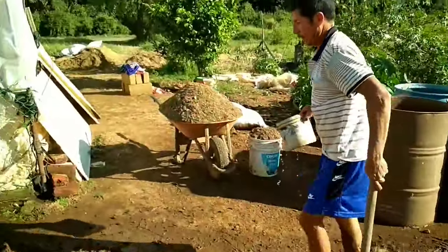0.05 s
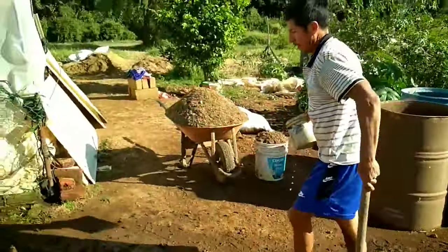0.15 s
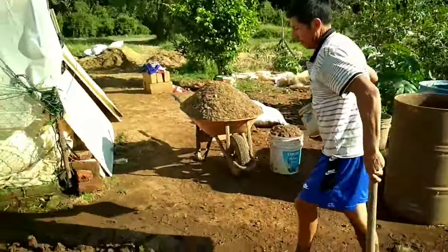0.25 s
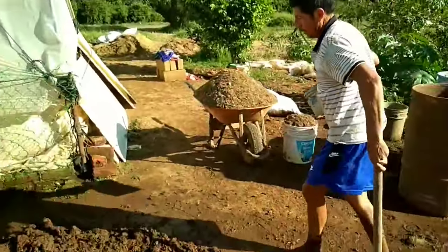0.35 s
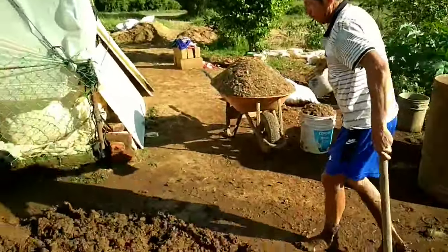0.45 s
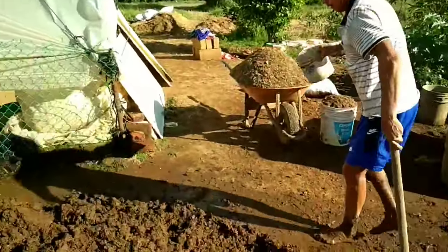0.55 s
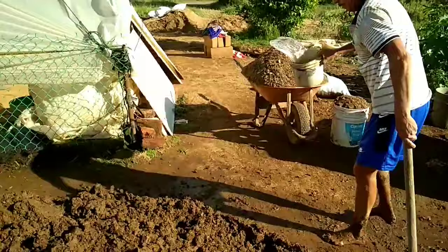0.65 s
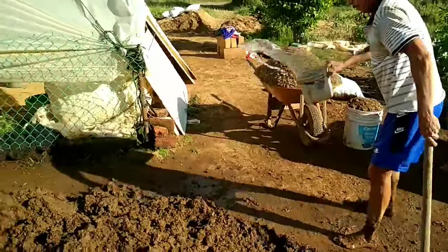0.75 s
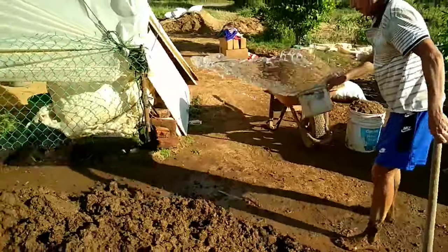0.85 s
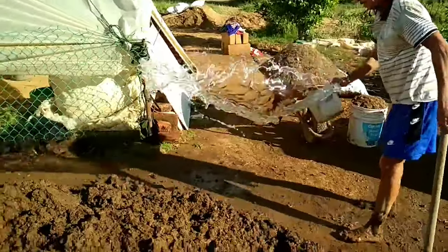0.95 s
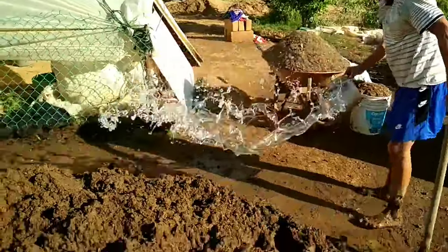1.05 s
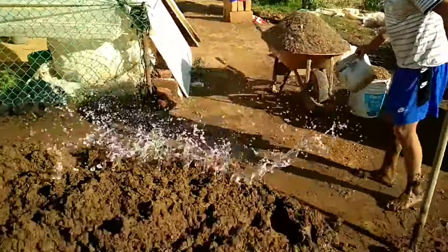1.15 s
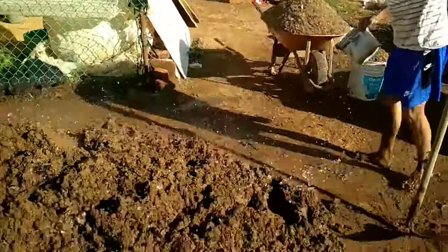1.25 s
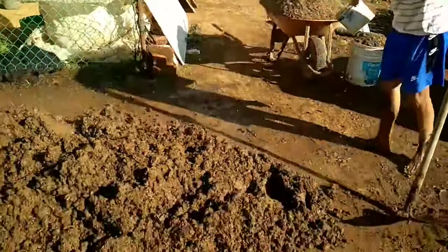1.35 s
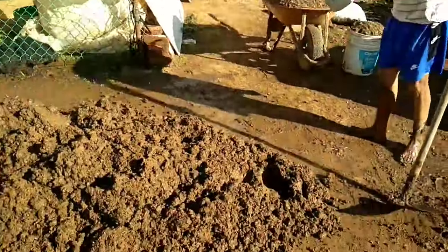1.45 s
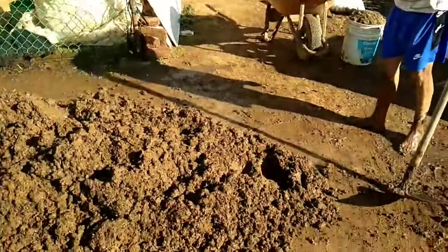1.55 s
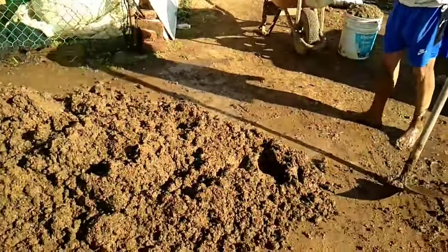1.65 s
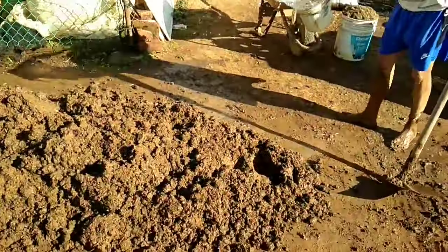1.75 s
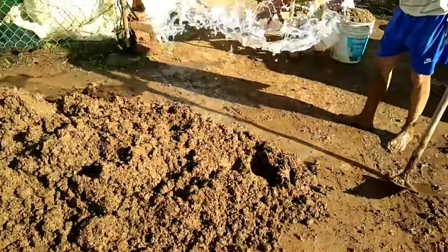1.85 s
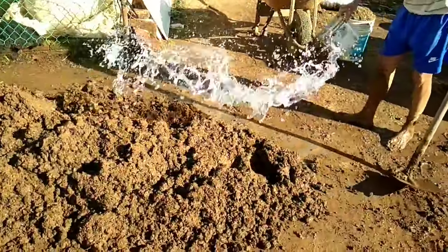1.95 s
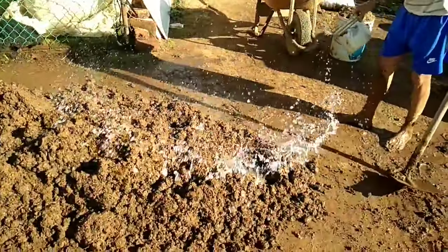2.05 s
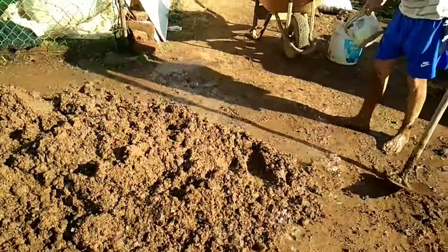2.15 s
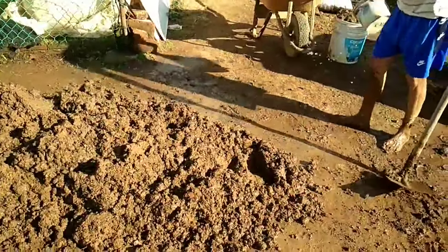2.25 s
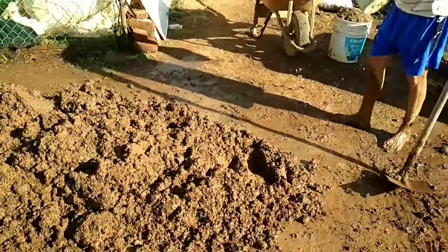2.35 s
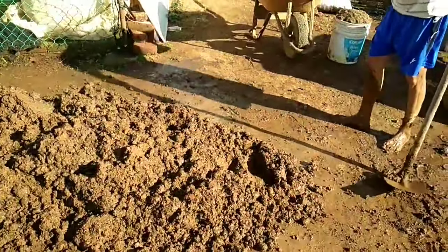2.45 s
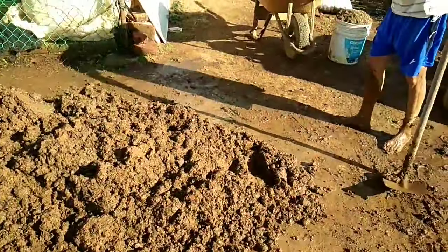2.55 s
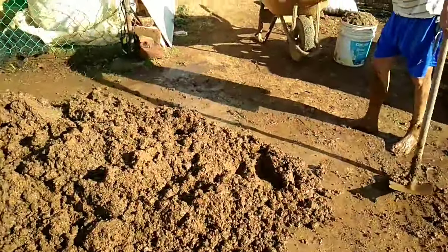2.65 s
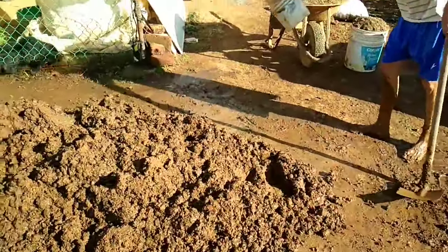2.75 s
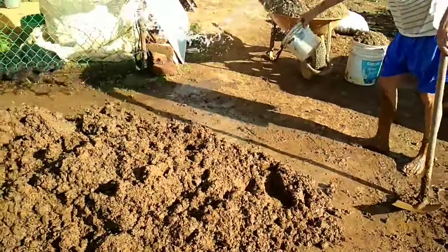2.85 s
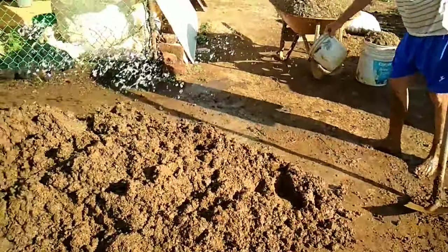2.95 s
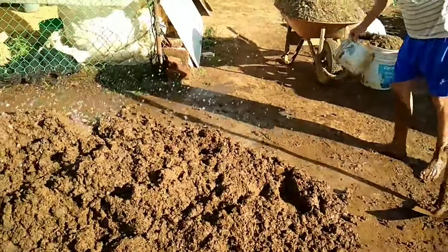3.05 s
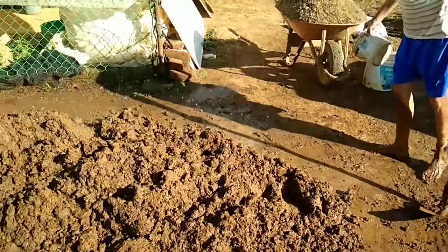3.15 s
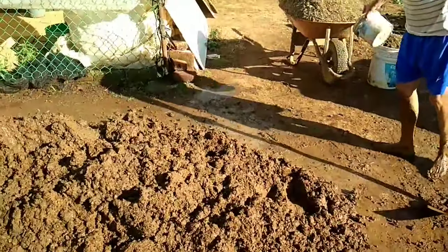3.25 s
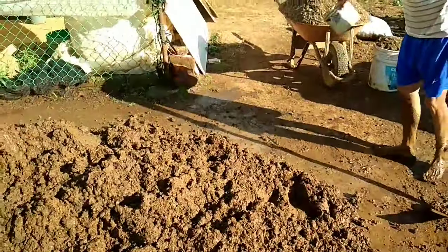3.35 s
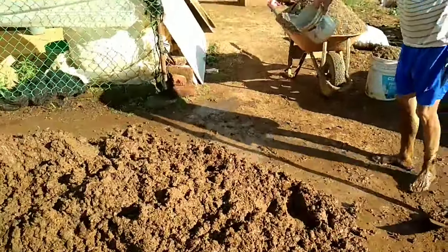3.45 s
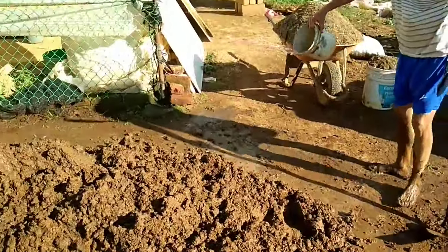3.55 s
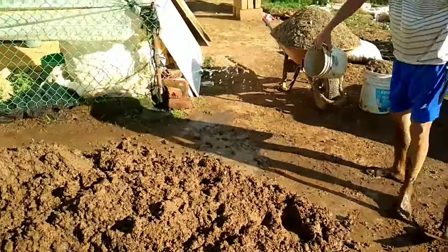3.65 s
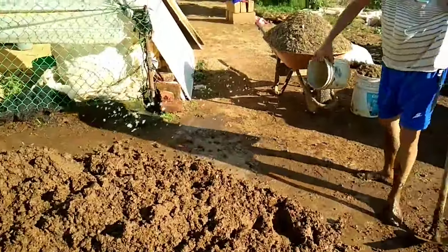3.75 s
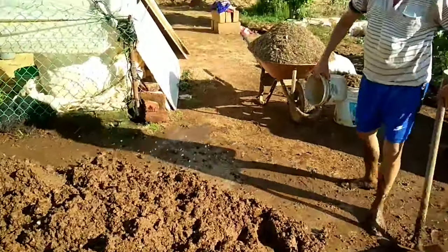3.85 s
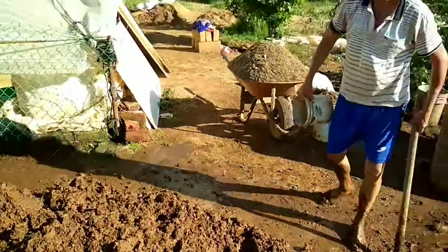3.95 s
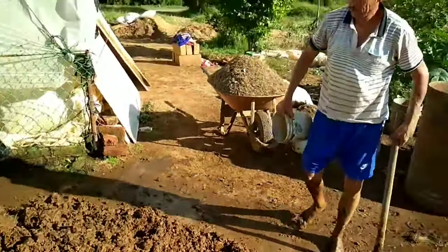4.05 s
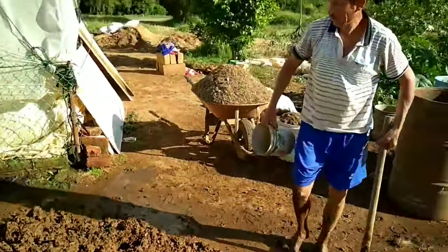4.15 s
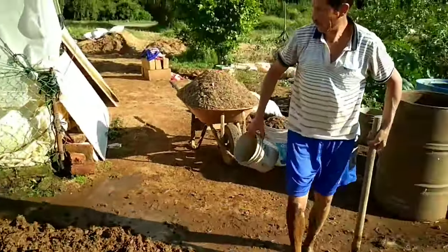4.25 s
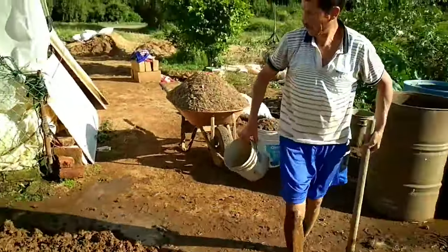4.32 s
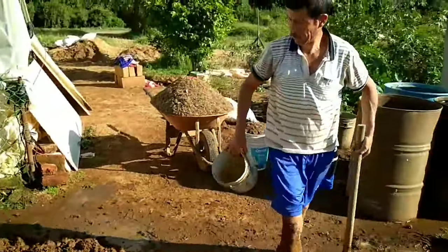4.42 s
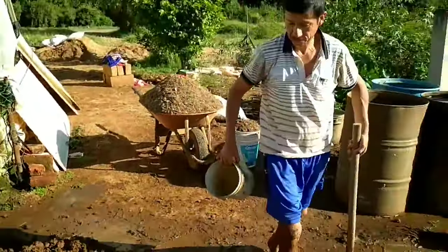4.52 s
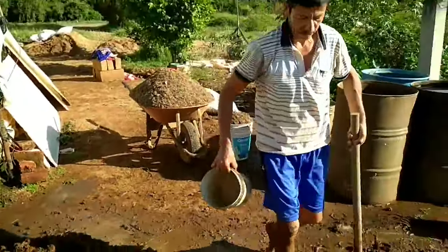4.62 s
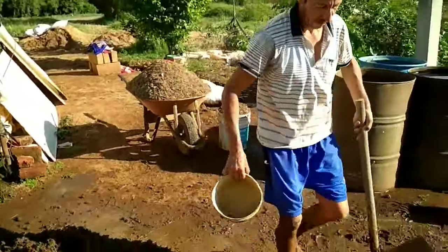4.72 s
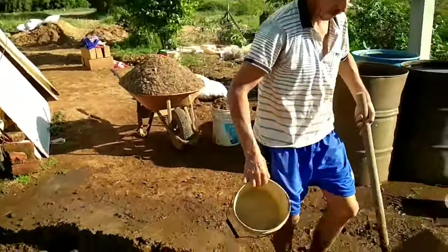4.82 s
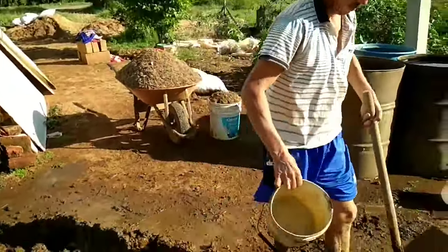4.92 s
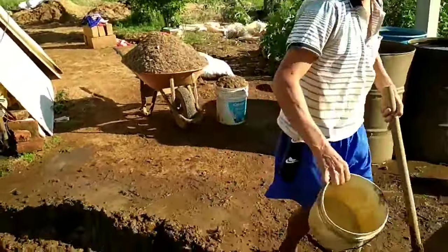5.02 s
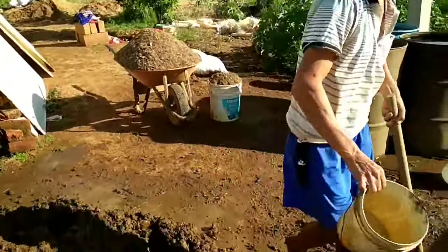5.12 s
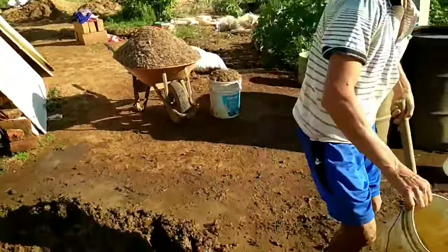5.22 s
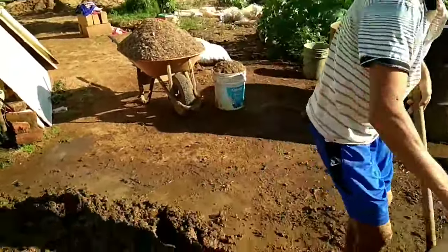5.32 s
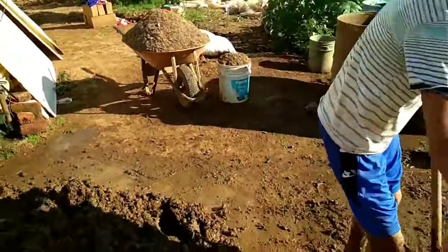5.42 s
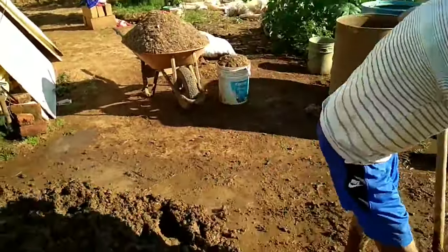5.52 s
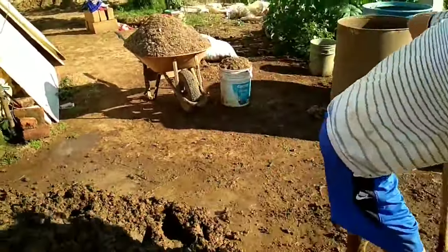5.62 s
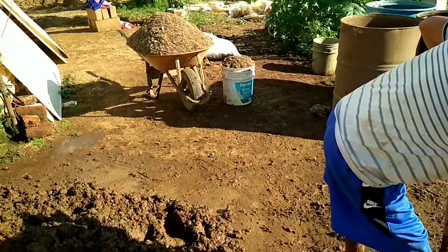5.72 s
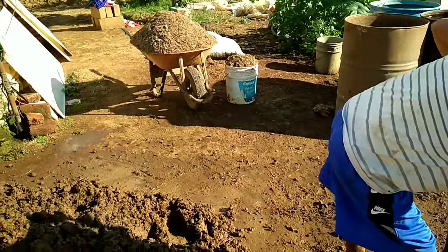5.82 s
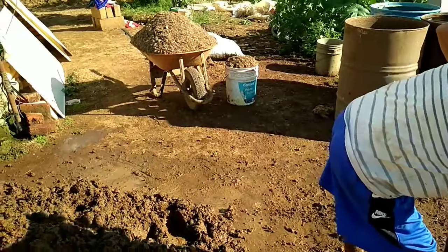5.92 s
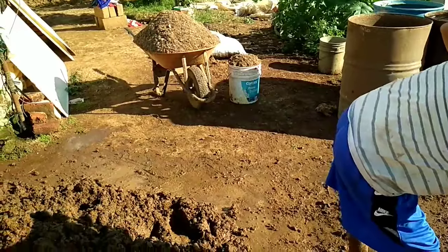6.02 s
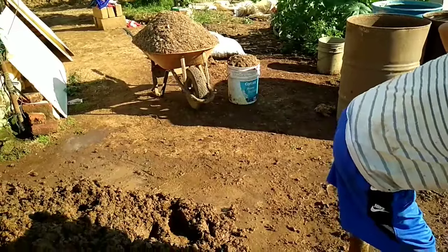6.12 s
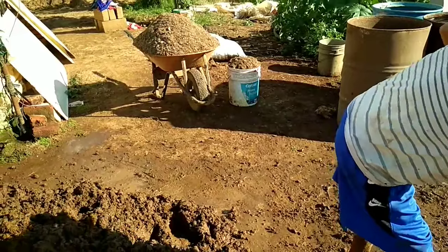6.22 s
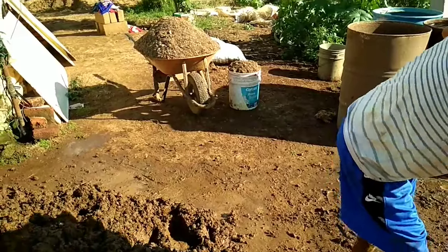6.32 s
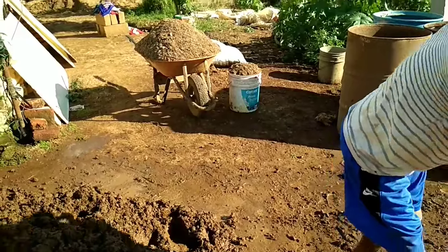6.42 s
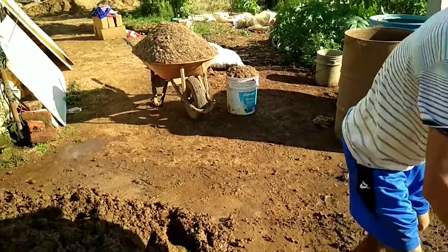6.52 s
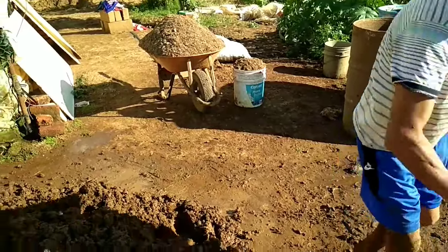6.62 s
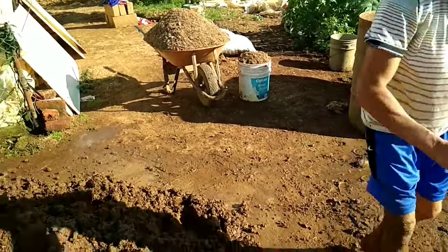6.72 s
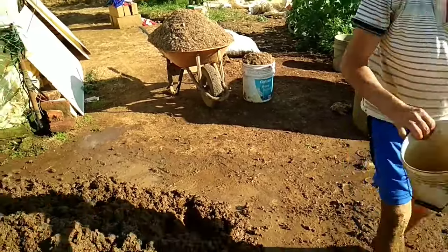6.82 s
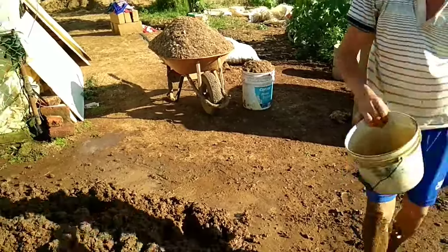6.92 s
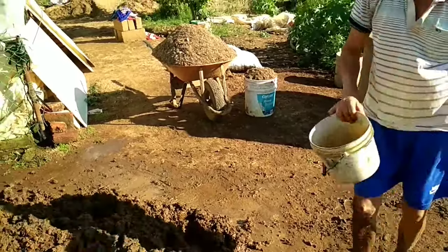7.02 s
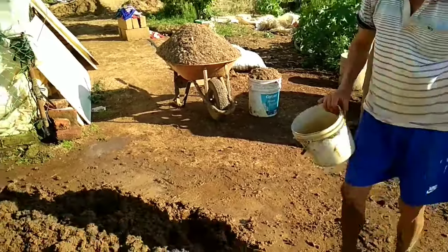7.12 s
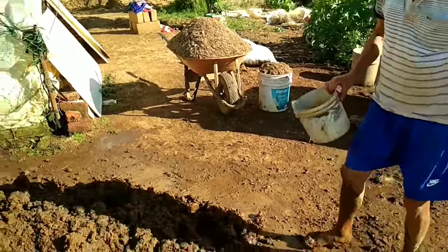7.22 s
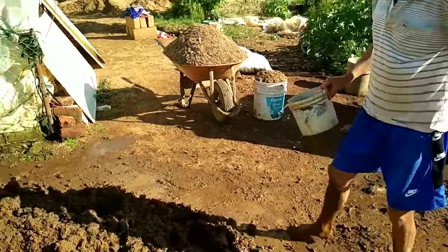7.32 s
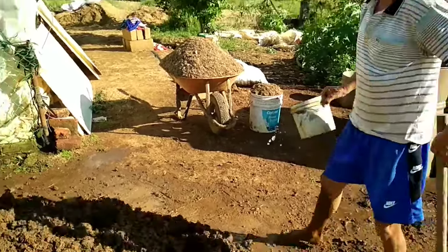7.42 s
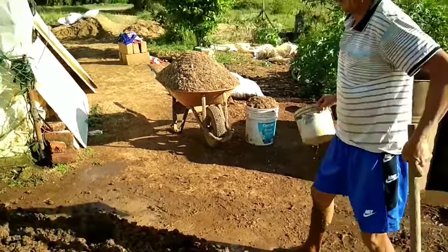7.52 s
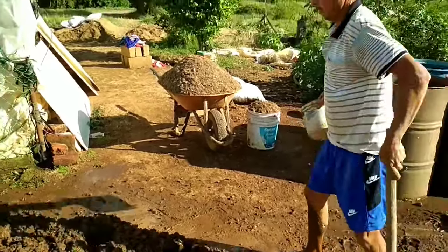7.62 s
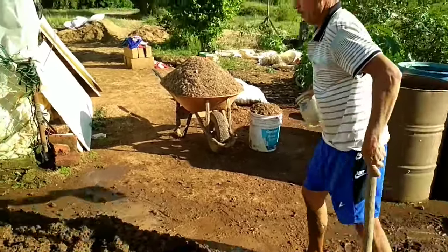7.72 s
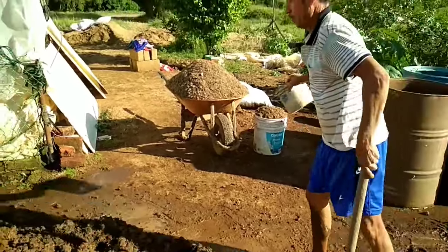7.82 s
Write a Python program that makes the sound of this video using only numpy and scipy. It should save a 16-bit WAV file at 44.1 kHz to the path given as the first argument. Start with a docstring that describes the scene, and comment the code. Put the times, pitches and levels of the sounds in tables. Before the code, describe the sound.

Splashes of water patter onto clay outdoors, with plastic bucket knocks, a gurgling refill, faint bird chirps and low wind rumble.

```python
"""Flinging water over wet clay

A barefoot man flings water from a plastic bucket, walks about and refills it. Drops patter and snap on
the mud, drips ring as tiny bubbles, the bucket wall knocks, its handle rattles and air gulps in the
dipped bucket. The yard echoes, two birds call and a breeze rumbles on the two microphone ports."""
import sys
import numpy as np
from scipy import signal
from scipy.io import wavfile
from scipy.ndimage import uniform_filter1d, map_coordinates

SR = 44100
rng = np.random.default_rng(int(sys.argv[2]) if len(sys.argv) > 2 else 0)


def store_wav(level_fs):
    """Save 16-bit WAV to argv[1]."""
    pcm = np.round(np.clip(np.atleast_2d(level_fs), -1, 1) * 32767)
    wavfile.write(sys.argv[1], SR, pcm.T.astype(np.int16))


N = 347067


def amp(db):
    return np.exp(np.asarray(db) * np.log(10) / 20)


def unit_rms(x):
    return x / np.sqrt(np.mean(x ** 2) + 1e-20)


def unit_peak(sound):
    """Gives the loudest 3 ms the power of a sine of peak 1."""
    return sound / np.sqrt(2 * uniform_filter1d(sound ** 2, size=128).max())


def butter(hz, kind="low", order=2):
    return signal.butter(order, hz, kind, fs=SR, output="sos")


def automation(rows, column):
    """One column of a timed table, read at every sample."""
    rows = np.array(rows)
    return np.interp(np.arange(N) / SR, rows[:, 0], rows[:, column])


def colour(x, points):
    """Minimum-phase EQ of unit energy, shaped by (f/Hz, level/dB) points."""
    hz, db = np.transpose(points)
    log_gain = np.interp(np.log(np.fft.rfftfreq(8192, 1 / SR) + 1), np.log(hz), db) * np.log(10) / 20
    mirrored = np.concatenate([log_gain, log_gain[-2:0:-1]])
    taps = np.fft.ifft(np.exp(np.conj(signal.hilbert(mirrored)))).real[:4096]
    taps = (taps / np.linalg.norm(taps)).reshape((1,) * (x.ndim - 1) + (-1,))
    return signal.oaconvolve(x, taps, axes=-1)[..., :len(x.T)]


def add(mix, s, sound):
    part = mix[round(s * SR):][:len(sound)]
    part += sound[:len(part)]


def contact(t60, blow, rise_s):
    """A first blow followed by dying gritty contact."""
    t = np.arange(8192) / SR
    grit = rng.standard_normal(8192) * amp(-60 * t / max(t60, .004)) * (1 - np.exp(-t / rise_s))
    grit /= np.linalg.norm(grit)
    grit[1] += blow
    return grit


def ring(modes, lift_db, drive, detune):
    """Modes of a body, randomly detuned by grip and load, shaken by the drive."""
    t = np.arange(4096)[:, None] / SR
    hz, db, t60 = np.transpose(modes)
    hz = hz * (1 + detune * rng.standard_normal(len(hz)))
    partials = amp(db + lift_db - 60 * t / t60) * np.sin(2 * np.pi * hz * t) * (1 - np.exp(-t / .0015))
    return unit_peak(signal.fftconvolve(drive, partials.sum(axis=1)))


def bubble(hz, cycles, glide):
    """A pocket of air rings and rises in pitch as it nears the surface."""
    turns = np.arange(int(3 * cycles * SR / hz)) * hz / SR
    envelope = np.exp(-turns / cycles * 2) * (1 - np.exp(-turns * 2))
    tone = np.sin(2 * np.pi * turns * (1 + glide * turns / cycles / 2)) * envelope
    return tone / np.linalg.norm(tone)


# Tone of the outdoor bed: f/Hz, level/dB
AIR_EQ = [(120, -26), (200, 20), (525, 12), (1950, 2.5), (3010, 3.5), (4100, -29), (15500, -39.5)]
def air():
    """A faint, wide bed of outdoor noise."""
    return amp(-80) * unit_rms(colour(rng.standard_normal((2, N)), AIR_EQ))


# Tone of the wind rumble: f/Hz, level/dB
RUMBLE_EQ = [(8.8, -58.5), (15, -6), (91, 0), (142, -5), (270, -28), (341, -32.5), (500, -46.5), (650, -72),
             (1100, -120)]
# Gust automation: t/s, level/dB, left minus right/dB
GUSTS = [(0.0, -77, 1), (0.06, -38.5, -8.5), (0.26, -56.5, 36), (0.46, -62.5, 17), (0.63, -42.5, 3),
         (0.68, -46, -3.5), (0.79, -51.5, 21.5), (0.99, -56.5, 5), (1.49, -66.5, 25), (1.97, -63.5, -8),
         (2.08, -51, 10), (2.41, -62.5, 24), (3.09, -44.5, 9.5), (3.64, -69, -1.5), (3.9, -56.5, -10),
         (4.08, -44.5, 3.5), (4.36, -57.5, -19.5), (4.56, -61.5, 32.5), (4.8, -47, -0.5), (5.13, -58, 19),
         (5.19, -42, 4), (5.39, -62, 26), (5.76, -49.5, -8), (5.87, -62, 43), (5.96, -63.5, 10),
         (6.53, -57.5, -27), (7.12, -69, -2), (7.61, -59.5, -13.5), (7.8, -71.5, 5), (7.87, -39.5, 0)]
def breeze():
    """Lumpy turbulence, mostly unrelated on the two ports."""
    left, right, both = rng.standard_normal((3, N))
    lumps = signal.sosfilt(butter(14), rng.standard_normal((3, N)))
    lumps_db = 4.66 * unit_rms(lumps[:2] + lumps[2])
    rumble = unit_rms(colour(np.array([left, right]) + .5 * both, RUMBLE_EQ) * amp(lumps_db))
    pan_db = automation(GUSTS, column=2) / 2
    return rumble * amp(automation(GUSTS, column=1) + np.array([pan_db, -pan_db]))


# Near bird cues: t/s, level/dB
CHIPS = [(0.567, -54), (1.4684, -52), (4.084, -58), (4.8052, -51), (5.4786, -49), (6.078, -45)]
# Far bird cues: t/s, length/s, start f/Hz, end f/Hz, level/dB
WHISTLES = [(0.736, 0.079, 2910, 3360, -79), (0.792, 0.049, 3130, 3000, -80),
            (7.529, 0.053, 3240, 3400, -79)]
def birds():
    """Off to the right, a near bird dips and lifts its pitch, echoing in the trees; a far one whistles."""
    out, t, dip_s = np.zeros(N), np.arange(760) / SR, .011
    hz = 6500 + np.where(t < dip_s, 3.0e6, 4.5e6) * abs(t - dip_s) ** 1.5
    chip = np.sin(2 * np.pi * np.cumsum(hz) / SR) * (t / t[-1]) ** 2 * signal.windows.tukey(760, .2)
    for s, db in CHIPS:
        trees = contact(0.17, blow=1.3, rise_s=0.0013)
        add(out, s - dip_s, amp(db) * signal.fftconvolve(chip, trees))
    for s, length, from_hz, to_hz, db in WHISTLES:
        n = int(length * SR)
        waver = 1 + 0.68 * uniform_filter1d(rng.standard_normal(n), size=100)
        hz = np.linspace(from_hz, to_hz, n) * waver
        add(out, s, amp(db) * np.sin(2 * np.pi * np.cumsum(hz) / SR) * np.hanning(n))
    return out * amp([[-5], [2.5]])


# Reverb time of the yard: f/Hz, t60/s
YARD_DECAY = [(300, 0.36), (1000, 0.35), (3000, 0.21), (8000, 0.1), (15000, 0.011)]
def yard(x):
    """Sheds, barrels and ground throw the sound back."""
    hz, t, noise = signal.stft(rng.standard_normal((2, 2, SR // 2)), SR, nperseg=256)
    alike = np.exp(-(hz / 1800) ** 2)[:, None]  # both ports share the bass of the echoes
    noise[:, 1] = alike * noise[:, 0] + np.sqrt(1 - alike ** 2) * noise[:, 1]
    band_hz, band_t60 = np.transpose(YARD_DECAY)
    t60 = np.interp(np.log(hz + 1), np.log(band_hz), band_t60)[:, None]
    tails = signal.istft(noise * amp(-60 * t / t60), SR, nperseg=256)[1]
    tails = np.pad(tails, ((0, 0), (0, 0), (200, 0))) / np.linalg.norm(tails[0, 0])  # 4.5 ms pre-delay
    first, second = (signal.oaconvolve(x, tail, axes=1)[:, :N] for tail in tails)
    # two echo tails crossfade quickly, so the echoes shimmer instead of ringing on one pitch
    turn = 2 * np.pi * 7.0 * np.arange(N) / SR
    return first * np.cos(turn) + second * np.sin(turn)


# Pan automation for the man: t/s, right port delay/ms, treble left minus right/dB
BEARING = [(0, .25, -1.5), (.6, .1, -2.5), (1.1, .02, -3), (2.5, .03, -3.5), (3.1, .12, -4), (4.1, .25, -4),
           (4.6, .05, -3.5), (5.2, .15, -1.5), (5.7, .26, 1), (7.1, .25, 1), (7.6, .04, -2)]
def place(pair):
    """Delays the right port and pans the treble to where the man stands."""
    delay = automation(BEARING, column=1) * SR / 1000
    pair = np.array([pair[0], map_coordinates(pair[1], [np.arange(N) - delay], order=3)])
    treble = signal.sosfilt(butter((3000, 11000), "band"), pair)
    pan_db = automation(BEARING, column=2) / 2
    return pair + treble * (amp(np.array([pan_db, -pan_db])) - 1)


# Pitched drip cues: t/s, level/dB, bubble f/Hz
DRIPS = [(.108, -64.5, 1123), (.287, -64.5, 946), (1.299, -46.5, 1256), (1.309, -44, 1413),
         (1.995, -42, 1510), (6.587, -63, 1170), (6.618, -57.5, 3160), (6.644, -70, 2880),
         (6.682, -59, 3100), (6.945, -42, 2230), (7.008, -43, 2263), (6.965, -52, 1440), (6.979, -43, 2640),
         (7.179, -58, 1550), (7.198, -64, 1530), (7.254, -64, 3700), (7.349, -57.5, 3400),
         (7.621, -63, 1230)]
def drips():
    """Each drip traps a small ringing bubble."""
    out = np.zeros(N)
    for s, db, hz in DRIPS:
        impact = contact(0.0095, blow=1.6, rise_s=0.00082)
        add(out, s, amp(db) * unit_peak(signal.fftconvolve(impact, bubble(hz, cycles=16, glide=0.074))))
    return out


# Wet snap cues: t/s, level/dB
SNAPS = [(0.046, -48.5), (0.109, -53), (0.234, -52), (0.272, -50), (0.2882, -40.5), (.315, -56),
         (.9764, -39.5), (1.024, -50), (1.041, -25.5), (1.059, -34.5), (1.11, -39), (1.1328, -36),
         (1.1463, -41), (1.1652, -28), (1.595, -59.5), (1.934, -50), (1.984, -35.5), (2.0711, -47),
         (2.2183, -25.5), (2.2654, -40), (2.4169, -36), (2.646, -39.5), (3.2083, -37), (3.8496, -61),
         (3.881, -44), (3.904, -44), (3.966, -52), (4.0114, -36), (5.046, -57), (5.181, -46), (5.4113, -41),
         (5.7519, -30.5), (6.094, -40), (6.1105, -38), (6.196, -44.5), (6.348, -38.5), (6.386, -36),
         (6.6223, -52), (6.934, -38), (6.948, -33), (6.979, -46), (7.012, -40), (7.07, -45), (7.174, -58),
         (7.203, -52), (7.63, -44), (7.673, -38.5)]
def snaps():
    """A single drop lands or mud lets go of a sole: a bright tick and a little spray."""
    out = np.zeros(N)
    for s, db in SNAPS:
        spray_t60 = 0.071 * amp(-0.49 * (db + 45))  # softer snaps spray longer
        tick = colour(contact(spray_t60, blow=0.35, rise_s=0.001), FINE_DROP_EQ)
        add(out, s, amp(db) * unit_peak(tick))
    return signal.sosfilt(butter(2500, "high"), out)


# Resonances of the dipped bucket: f/Hz, level/dB, t60/s
CAVITY_MODES = [(321, -23, 0.16), (439, -2.5, 0.036), (526, 5.5, 0.022), (677, 0, 0.022), (920, 10.5, 0.01),
                (1114, -4.5, 0.025), (1610, 12, 0.0058)]
# Refill cues: t/s, level/dB, bubble f/Hz, drive t60/s
GULPS = [(5.703, -19, 332, 0.044), (5.754, -20, 322, 0.04), (5.772, -31.5, 308, 0.1),
         (5.837, -42.5, 292, 0.025), (5.868, -40, 334, 0.035), (6.013, -23, 366.3, 0.12),
         (6.046, -32, 567, 0.049), (6.158, -27, 384, 0.084), (6.192, -18, 360, 0.025),
         (6.24, -44, 506, 0.04), (6.271, -29.5, 330, 0.063), (6.307, -31.5, 485, 0.072),
         (6.388, -21.5, 460, 0.009), (6.455, -30.5, 352, 0.0026)]
def gulps():
    """Each gulp frees a big bubble and shakes the cavity and wall of the bucket."""
    out = np.zeros(N)
    for s, db, hz, t60 in GULPS:
        drive = contact(t60, blow=0.62, rise_s=0.0074)
        glug = signal.fftconvolve(drive, bubble(hz, cycles=8.6, glide=0.0066))
        slap = colour(drive, FAT_DROP_EQ)  # water closes over the pocket
        add(out, s, amp(db - 12) * unit_peak(glug))
        add(out, s, amp(db - 12.5) * ring(CAVITY_MODES, 0, drive, detune=0.037))
        add(out, s, amp(db - 17) * unit_peak(slap))
    return signal.sosfilt(butter(280, "high", order=4), out)  # a small bucket radiates no bass


# Resonances of the plastic wall: f/Hz, level/dB, t60/s
WALL_MODES = [(402, -3, .05), (462, -3, .035), (780, -4, .034), (880, -4, .026), (1200, 5, .024),
              (1420, 5, .024), (1640, 10, .024), (1900, 3, .02), (2270, 7, .022), (2680, 6, .02),
              (2950, 4, .018), (3440, -2, .015)]
# Per wall mode: water in the bucket favours it (+1), damps it (-1) or leaves it alone (0)
WATER_LOADING = [-1, 1, 1, -1] + [0] * 8
# Knocks on the wall: t/s, level/dB, focus f/Hz, hollow/dB, body/dB, crack/dB, water tilt/dB
WALL_BLOWS = [(0.9849, -35.5, 1574, 3.5, 8, -26.5, 3), (1.8682, -34.5, 2100, -3, 5, -7.5, 9),
              (1.976, -43.5, 1360, -30, 10.5, -30, 0), (2.783, -28.5, 1424, -15, 11, -2.5, 0.5),
              (2.995, -42.5, 1035, -28.5, 3.5, -13, 0.5), (3.946, -34, 2170, -21.5, -12, -16.5, -14.5),
              (4.5747, -37, 1810, -4, -3, -3, -11.5), (5.164, -29, 1730, -5, -16, -9, -3),
              (5.5944, -40.5, 1280, -11, -9, -42, 9), (6.3528, -32.5, 1183, -12, -41, -7.5, 0),
              (7.576, -51, 1620, -5.5, -51, -1.5, 9.5)]
# Handle hits on the rim: t/s, level/dB, focus f/Hz, crack/dB
HANDLE_RATTLES = [(0.6755, -53.5, 1420, -18), (1.6512, -53, 1700, -4), (1.6792, -53.5, 1640, -1),
                  (2.593, -58.5, 1370, -15), (2.6197, -39, 1490, -3.5), (2.6558, -40.5, 1900, -5.5),
                  (2.7039, -51.5, 1360, -5.5), (3.2477, -52.5, 1510, -0.5), (3.4552, -64, 1800, -15),
                  (3.4655, -43.5, 2400, -29), (3.4841, -51, 1760, -2.5), (3.51, -40, 2280, -13),
                  (3.537, -59, 1730, -13), (3.6988, -53.5, 1830, -47), (0.996, -60, 1630, -36.5),
                  (4.343, -58.5, 1660, -47), (5.2084, -44.5, 1670, -21), (6.1368, -38, 2060, -12),
                  (3.961, -34, 2170, -7), (5.932, -52.5, 950, -36), (4.999, -62, 1630, -36),
                  (5.961, -45, 1283, -38), (5.9912, -37.5, 1323, -10.5), (6.1102, -33, 1440, -3),
                  (7.0056, -43.5, 2430, -29), (7.232, -53, 2400, -22.5)]
def bucket_knocks():
    """Strike point and water load set which modes sound; a dull clack and a gritty crack ride on top."""
    tones, clacks = np.zeros((2, N))
    mode_hz = np.array(WALL_MODES)[:, 0]

    def strike(s, db, focus_hz, hollow_db, body_db, crack_db, water_db, t60, clack_db):
        drive = contact(t60, blow=0.65, rise_s=0.002)
        focus_db = -11 * abs(np.log2(mode_hz / focus_hz))
        lift_db = np.select([mode_hz < 600, mode_hz < 1000], [hollow_db, body_db], focus_db)
        lift_db += water_db * np.array(WATER_LOADING)
        clack_eq = [(focus_hz / 3, -26), (focus_hz, 0), (focus_hz * 3, -14)]
        clack = unit_peak(colour(contact(2 * t60, blow=0.096, rise_s=0.003), clack_eq))
        s -= .0015  # contact builds before the blow peaks
        add(clacks, s, amp(db + clack_db) * clack + amp(db + crack_db) * grit_crack(2 * t60))
        add(tones, s, amp(db) * ring(WALL_MODES, lift_db, drive, detune=0.013))

    for blow in WALL_BLOWS:
        strike(*blow, t60=0.04, clack_db=-9)
    for s, db, focus_hz, crack_db in HANDLE_RATTLES:  # a rattle hardly moves the wall: little bass
        strike(s, db, focus_hz, hollow_db=-32, body_db=-32, crack_db=crack_db, water_db=0,
               t60=0.022, clack_db=-13)
    return tones, clacks


# Tone of grit on the bucket: f/Hz, level/dB
GRIT_EQ = [(2500, -0.5), (5000, 1), (8500, 3.5), (11000, -3.5), (15500, -19)]
def grit_crack(t60):
    """Grit cracks under a blow: the bright edge of a knock."""
    return unit_peak(colour(contact(t60, blow=0.6, rise_s=0.009), GRIT_EQ))


def fall_db(t, rise, hold, sag_db_per_s, trickle_db):
    """Envelope of one fall of water: it swells, sags while it lasts, stops and trickles on."""
    swell_db, stop_db_per_s, trickle_db_per_s = 25.5, 432, 118
    after = np.maximum(t - rise - hold, 0)
    swell = -swell_db * np.clip(1 - t / rise, 0, 1)
    sag = -sag_db_per_s * np.clip(t - rise, 0, hold)
    trickle = min(trickle_db, 0) * (after > 0) - trickle_db_per_s * after
    return swell + sag + np.maximum(-stop_db_per_s * after, trickle)


# Water landing, sloshing or dribbling:
# t/s, rise/s, hold/s, fine drop level/dB, fat drop level/dB, relative trickle level/dB (capped at 0)
FALLS = [(0.024, 0.012, 0.38, -68.5, -82, 0), (0.807, 0.041, 0.11, -62.5, -110, 1),
         (0.974, 0.0085, 0.13, -48, -46.5, -10), (1.125, 0.02, 0.18, -35.5, -43, -9.5),
         (1.845, 0.022, 0.38, -55.5, -50, -8), (1.936, 0.13, 0.16, -33.5, -45.5, -16),
         (2.404, 0.0065, 0.028, -53.5, -67, 31), (2.668, 0.13, 0.29, -65.5, -70, 4),
         (3.028, 0.026, 0.12, -40, -57, -8), (3.45, 0.012, 0.079, -66.5, -54.5, -17),
         (3.758, 0.19, 0.082, -51.5, -107, -8), (4.466, 0.014, 0, -61, -84.5, -3),
         (4.915, 0.01, 0.32, -65, -100, 10), (5.407, 0.0067, 0.1, -66.5, -79.5, 7),
         (5.693, 0.061, 0.025, -50.5, -48.5, -2), (5.984, 0.0054, 0.25, -53, -48, 5),
         (6.21, 0.11, 0.11, -52, -50, 21), (6.51, 0.15, 0.17, -67, -104, 29),
         (6.918, 0.035, 0.077, -53.5, -57.5, 2.5), (7.556, 0.0069, 0.38, -65, -69, 3)]
def flow_db():
    """Levels of fine and fat drops over all falls; heavy water lands first, so the fat drops sag faster."""
    t = np.arange(SR) / SR
    fine_power = np.full(N, amp(2 * -86.5))  # floor: wet ground ticks between falls
    fat_power = np.full(N, amp(2 * -103))
    for s, rise, hold, fine_db, fat_db, trickle_db in FALLS:
        fine_shape = fall_db(t, rise, hold, sag_db_per_s=7, trickle_db=trickle_db)
        fat_shape = fall_db(t, rise, hold, sag_db_per_s=80.5, trickle_db=trickle_db - 2.5)
        add(fine_power, s, amp(2 * (fine_db + fine_shape)))
        add(fat_power, s, amp(2 * (fat_db + fat_shape)))
    return 10 * np.log10(fine_power), 10 * np.log10(fat_power)


def drops(eq, lo_hz, hi_hz, cycles, per_strip_s, spread_db, wash, patchy_db):
    """Uneven drops land in flurries on 12 strips of ground, each with its own pitch and stereo lag."""
    out = np.zeros((2, N))
    lags = (-9, 3, -2, 10, -5, 6, 0, -7, 8, -3, 5, -10)  # samples
    for hz, lag in zip(np.geomspace(lo_hz, hi_hz, 12), lags):
        luck, size = rng.random(N) * SR / per_strip_s, np.zeros(N)
        lands = luck < 1
        size[lands] = amp(spread_db * np.minimum(-np.log(luck[lands] + 1e-9), 4))
        drift = rng.standard_normal(N // 50 + 2)
        drift = unit_rms(uniform_filter1d(uniform_filter1d(drift, size=12), size=12))
        flurry = np.interp(np.arange(N) / 50, np.arange(len(drift)), amp(patchy_db * drift))
        landing = flurry * (unit_rms(size) + wash * rng.standard_normal(N))
        strip = signal.oaconvolve(landing, bubble(hz, cycles, glide=0.23))[:N] * np.sqrt(hz / hi_hz)
        out += [strip, np.roll(strip, lag)]
    return unit_rms(colour(out, eq))


def duck_lows(x, hz, gain_db):
    """A moving low shelf that only cuts."""
    return x - signal.sosfiltfilt(butter(hz), x) * (1 - amp(np.minimum(gain_db, 0)))


# Tones of fine spray and of fat drops on mud: f/Hz, level/dB
FINE_DROP_EQ = [(1500, -23.5), (3000, -9), (5000, -8), (7000, -2), (9000, 1), (12000, -1), (15500, -4.5)]
FAT_DROP_EQ = [(300, -10), (600, -1.5), (1000, 0), (1700, -1.5), (2600, -3), (4000, -12.5), (7000, -28)]
def patter():
    """Flung water lands on the clay as fine and fat drops, in clumps that both share."""
    clumps = unit_rms(signal.sosfilt(butter(60), rng.standard_normal(N)))
    fine = drops(FINE_DROP_EQ, 2200, 15000, cycles=0.29, per_strip_s=230,
                 spread_db=3, wash=0.9, patchy_db=3.5)
    fat = drops(FAT_DROP_EQ, 500, 4500, cycles=0.89, per_strip_s=58,
                spread_db=1.5, wash=0.95, patchy_db=3.5)
    plinks = drops(FAT_DROP_EQ, 900, 4200, cycles=20, per_strip_s=6.8,
                   spread_db=1, wash=0.05, patchy_db=-7.5)
    ticks = amp(4 * rng.exponential(1, N).clip(0, 3)) * (rng.random(N) < 220 / SR)
    fine += amp(-12.5) * unit_rms(colour(ticks, FINE_DROP_EQ))  # near drops land as single sharp ticks
    fat += amp(-8) * plinks  # some drops trap a bubble and ring
    fine_db, fat_db = flow_db()
    fat = duck_lows(fat, 1200, 2 * (fat_db + 48))  # only heavy water thuds
    fine = duck_lows(fine, 4500, 0.81 * (fat_db - fine_db + 19))  # a thin spray is all treble
    return fine * amp(fine_db + 0.8 * clumps) + fat * amp(fat_db + 1.8 * clumps)


def scene():
    """Water and bucket with their echoes, panned with the man, over birds, breeze and air."""
    tones, clacks = bucket_knocks()
    near = patter() + snaps() + clacks + gulps() + drips()
    echoes = amp(-11.5) * yard(near + .4 * tones + clacks)  # the wall beams its tones, the clack spreads
    return air() + place(near + tones + echoes) + birds() + breeze()


def record(dry):
    """A steep high cut at 15650 Hz."""
    return signal.oaconvolve(dry, signal.firwin(511, 15650, window=("kaiser", 9), fs=SR)[None], "same")


dry = scene()
out = record(dry)
store_wav(out)
```